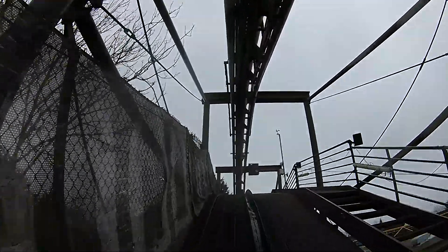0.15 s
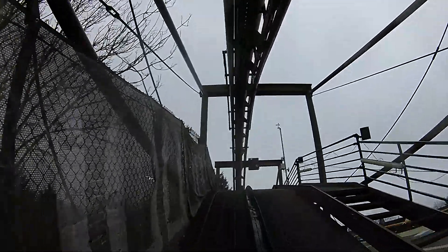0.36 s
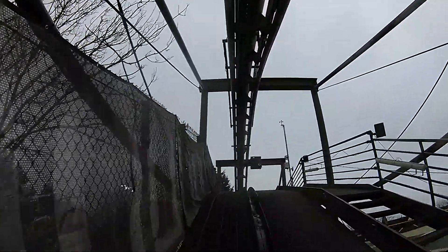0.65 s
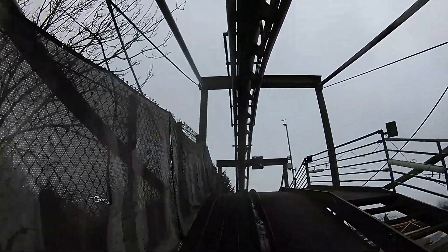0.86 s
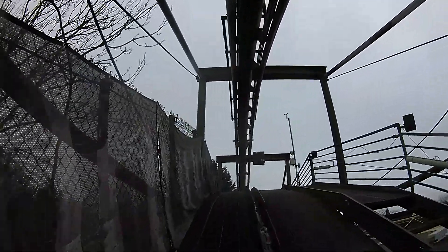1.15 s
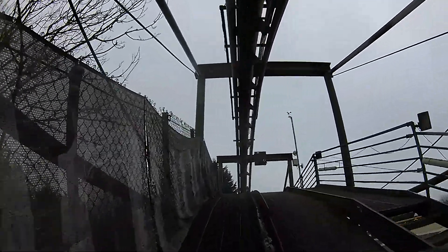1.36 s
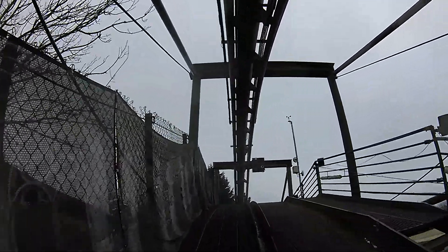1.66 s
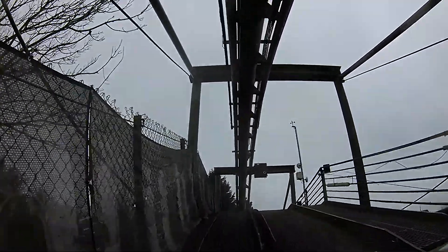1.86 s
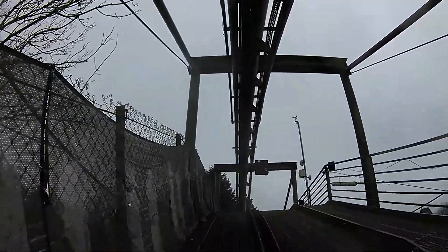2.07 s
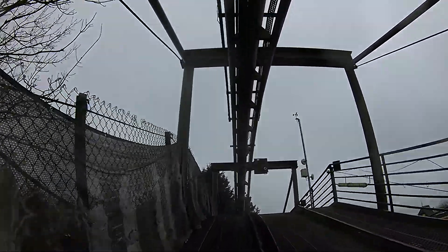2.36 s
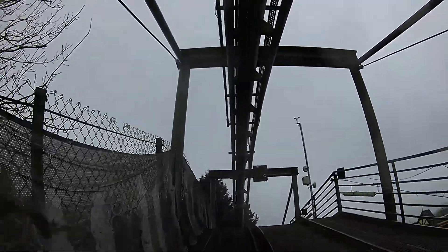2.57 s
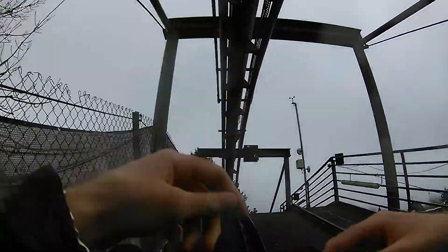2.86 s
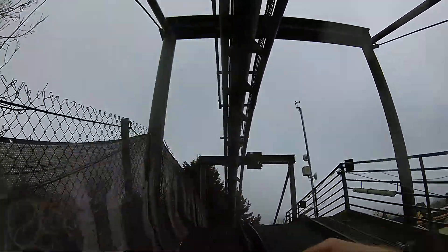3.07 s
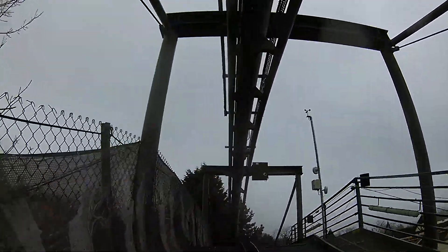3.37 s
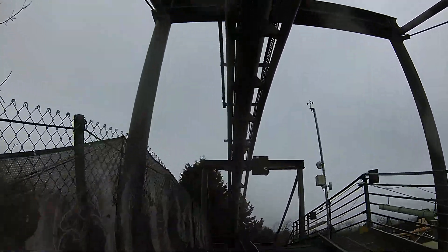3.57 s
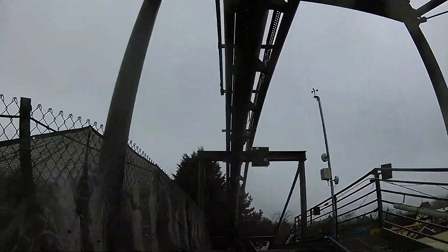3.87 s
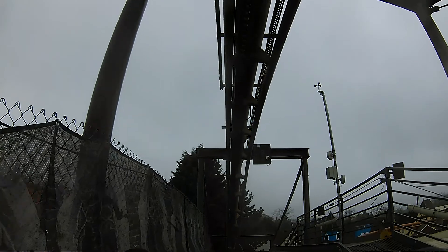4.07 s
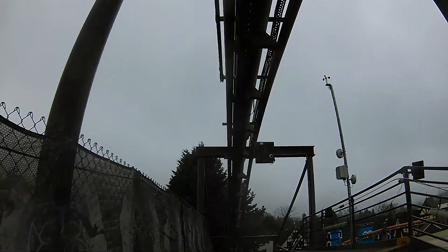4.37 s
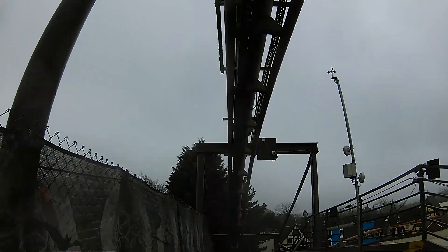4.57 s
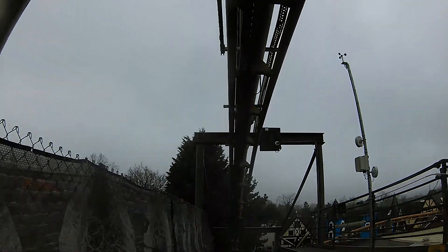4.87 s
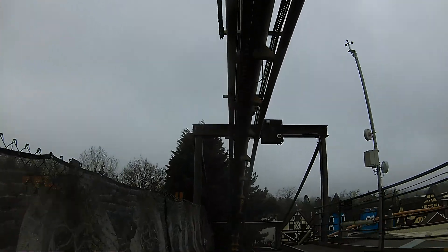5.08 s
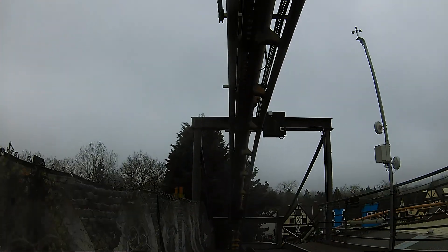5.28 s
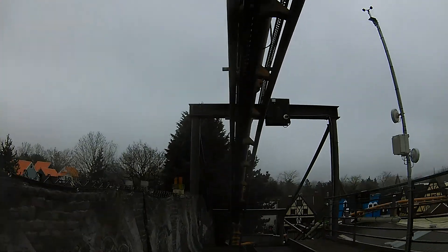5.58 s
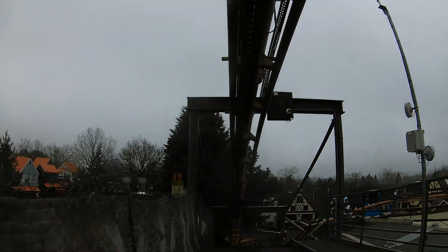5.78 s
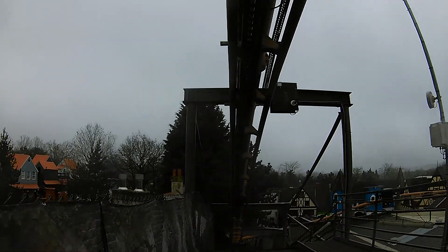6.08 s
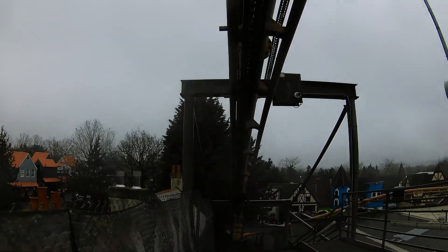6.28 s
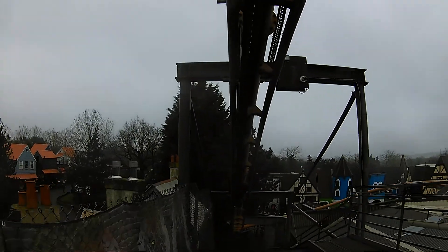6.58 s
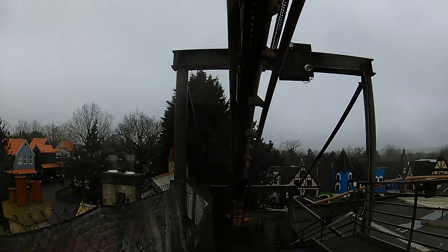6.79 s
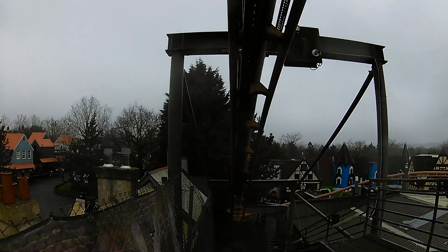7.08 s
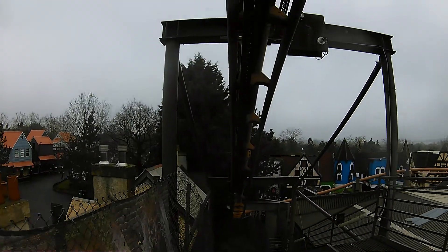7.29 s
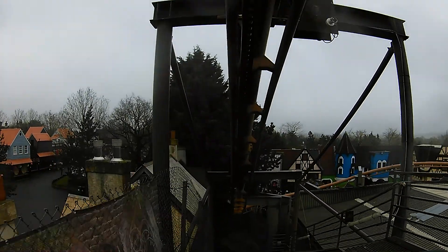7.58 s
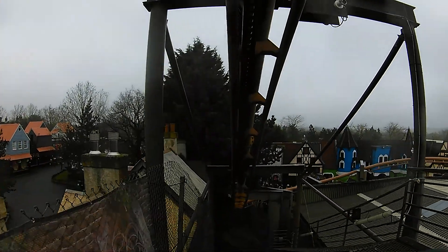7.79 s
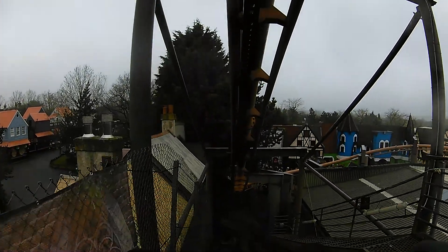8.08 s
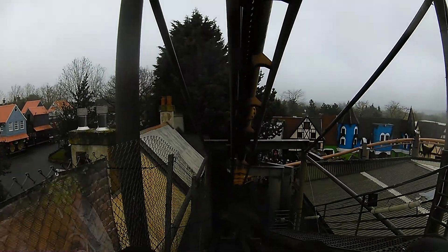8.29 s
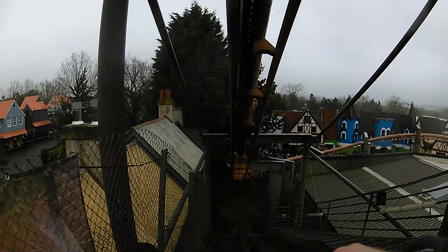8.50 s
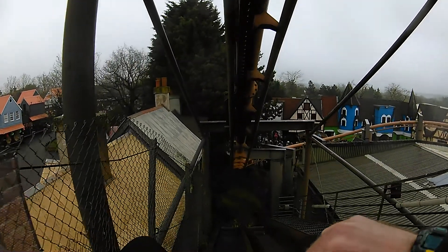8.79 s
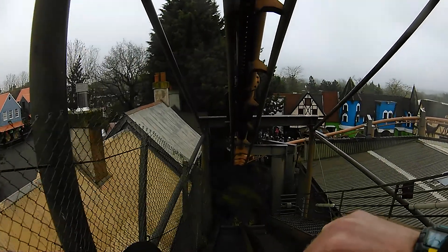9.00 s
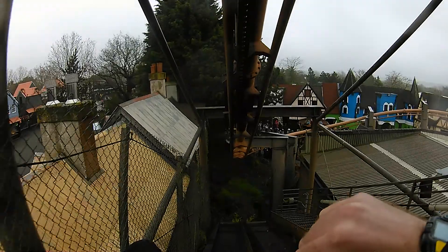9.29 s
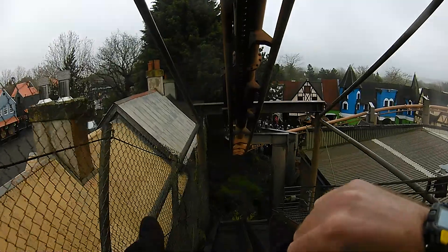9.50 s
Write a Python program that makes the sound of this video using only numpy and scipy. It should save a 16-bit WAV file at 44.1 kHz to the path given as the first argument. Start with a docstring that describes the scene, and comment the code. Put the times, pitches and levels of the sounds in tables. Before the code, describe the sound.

On board a climbing coaster train, bright steel clatter and rattle gradually die away under low wind puffs, before a few hard close taps.

```python
"""A train is hauled up a steel lift hill, heard from a small microphone in a hard case on board.
From the start, links and safety dogs clank about five times a second: swarms of tiny contacts ring the steel.
A noisy rattle continues between the blows, and filtered low noise makes the wind that buffets the port.
Clanks and rattle fade as the train moves off the chain; far air noise stays steady beneath.
Near the end a few sharp taps land on the case and set its short, damped modes ringing."""
import sys
import numpy as np
from scipy import signal
from scipy.fft import rfft, irfft
from scipy.io import wavfile

SR = 44100
rng = np.random.default_rng(int(sys.argv[2]) if len(sys.argv) > 2 else 0)


def waveform_to_disk(signal):
    """Save audio, clipped to [-1, 1], as 16-bit WAV at the path in sys.argv[1]."""
    frames = np.transpose(np.atleast_2d(signal))
    scaled = np.clip(frames, -1, 1) * 32767
    samples = np.round(scaled).astype(np.int16)
    wavfile.write(sys.argv[1], SR, samples)


def ratio(d):
    """dB to gain"""
    e = np.asarray(d, float) / 20
    return 10 ** e


N = 425565

# Clanks of links and safety dogs, on a beat of about .18 s with knocks between; ring levels are nominal:
# start_s, peak_db (main ring), deep_db (against the peak), deep_hz (centre), bright_db (against the peak),
# t60_s (before limits and the stretch of each region)
CLANK_BLOWS = [(.004, -18, -9.5, 1510, -13, 0.047), (.147, -5, -14, 1780, -6.5, 0.13),
               (.182, -15.5, -12.5, 1510, -16, 0.4), (.311, -16.5, -14.5, 1730, -18, 0.25),
               (.338, -11.5, -11.5, 1970, -17, 0.29), (.363, -11, -15, 1400, -10.5, 0.13),
               (.453, -18.5, -43, 1250, -27, 0.19), (.505, -16.5, -25, 1710, -5.5, 0.38),
               (.545, -1, -22, 1400, -13.5, 0.1), (.663, -14.5, -26, 1840, -11, 0.39),
               (.735, -6, -19.5, 1800, -14.5, 0.22), (.822, -15, -3, 1240, -14.5, 0.23),
               (.909, -4, -17, 1330, -12.5, 0.17), (1.007, -19.5, -17, 1300, -6, 0.29),
               (1.058, -15, -15, 1230, -14.5, 0.4), (1.099, -12.5, -6, 1700, -15, .12),
               (1.226, -9.5, -14.5, 1650, -13.5, 0.54), (1.26, -5.5, -14.5, 1310, -5, 0.092),
               (1.392, -13.5, -13.5, 1630, -11, 0.72), (1.463, -6.5, -16, 1910, -10.5, .079),
               (1.643, .5, -19.5, 1240, -17.5, 0.13), (1.746, -18.5, -12, 1780, -14, 1),
               (1.849, -33.5, -10, 1230, 0, 0.14), (1.916, -17.5, -38, 1530, -8, 0.21),
               (2.011, -3, -18, 1740, -15.5, 0.18), (2.134, -18.5, -25, 1850, -15, .57),
               (2.173, -9, -14, 1730, -11, .15), (2.206, -9.5, -20, 1750, -13.5, .095),
               (2.301, -18.5, -25, 1840, -21, 0.29), (2.369, -7.5, -16.5, 1230, -5, 0.19),
               (2.547, -12.5, -18, 1150, -12, 0.2), (2.679, -18.5, -12, 1230, -15, 0.22),
               (2.749, -4.5, -17.5, 1360, -13, 0.14), (2.869, -21, -10.5, 1130, -14, 0.28),
               (2.939, -22.5, -14, 1220, -1.5, 0.085), (3.08, -19, -5.5, 1250, -1.5, 0.14),
               (3.117, -28, -13, 1230, -4, 0.11), (3.312, -12.5, -14.5, 1010, -0.5, 0.21),
               (3.44, -21, -24, 1190, -14, 0.16), (3.463, -12, -12, 1230, -3.5, 0.22),
               (3.507, -24.5, -3.5, 1190, -3.5, 0.15), (3.587, -27, -13, 1820, -13, 0.15),
               (3.629, -31, -10, 1160, -9, 0.29), (3.847, -38, 2.5, 1540, 1, 0.091),
               (4.014, -26, -14.5, 1250, -13, 0.2), (4.154, -26.5, -11, 1810, -8, 0.36),
               (4.24, -19, -14.5, 1230, -5, 0.28), (4.362, -21.5, -14, 1270, -11, .24),
               (4.396, -25.5, -5, 1970, -1, 0.29), (4.592, -23, -26, 1780, -14, 0.22),
               (4.72, -36.5, -1, 1740, -8, 0.26), (4.907, -29, -20, 1680, -17, 0.16),
               (4.944, -17.5, -31, 1290, -23, .25), (5.106, -26, -24, 1830, -15, .25),
               (5.142, -23, -10.5, 1940, 3, 0.18), (5.256, -28, -15, 1820, -14, .3),
               (5.303, -26.5, -5.5, 1940, 3, 0.19), (5.45, -32, -3, 1800, -8, 0.18),
               (5.769, -47, -5, 1740, -23, 0.27), (5.649, -20, -17.5, 1700, -21, 0.25),
               (5.866, -34, -32, 1740, -5, 0.25), (6.038, -24.5, -10.5, 1780, 0, 0.23),
               (6.119, -26.5, -10, 1800, -6, 0.32), (6.204, -24, -38, 1400, -14, 0.28),
               (6.363, -33, -7, 885, -10, 0.23), (6.44, -31, -10, 1590, -14, 0.27),
               (6.497, -27, -3.5, 1200, -9, 0.22), (6.537, -32.5, 0, 1720, -3, 0.32),
               (6.738, -27.5, -14, 1820, -8, 0.21), (6.94, -22.5, -24, 1800, -15.5, 0.26),
               (7.108, -21.5, -29, 1230, -9, 0.45), (7.207, -37.5, 1, 1230, -8, 0.23),
               (7.289, -27.5, -25, 1530, -17, 0.21), (7.368, -39.5, -10, 1390, -9, 0.48),
               (7.548, -46, -10, 1600, 0, 0.043), (7.594, -41.5, -3, 1630, -3, 0.13),
               (7.708, -38, -5, 1520, -28, 0.2), (7.787, -29, -27, 1250, -27, .4),
               (7.841, -23.5, -20, 1070, -6.5, .26), (7.982, -25.5, -35, 1230, -17, 0.29),
               (8.027, -37, -7, 1230, -6, 0.18), (8.09, -36.5, 0, 1570, -17, 0.37),
               (8.187, -40, -6, 940, -5, 0.12), (8.297, -27.5, -45, 1410, -38, 0.32),
               (8.375, -30.5, -19, 1660, -7.5, 0.27), (8.534, -31, -7, 1600, -11, 0.15),
               (8.694, -23.5, -18.5, 1220, -19, 0.36), (8.749, -31, -27, 1670, -3.5, 0.2),
               (8.845, -31.5, -13, 1130, -16, 0.45), (8.933, -27.5, -22, 1320, -18, 0.22),
               (9.068, -33, -8, 1120, -19, 0.13), (9.19, -46, -18, 1230, -9, 0.36),
               (9.269, -32.5, -24, 1170, -16, 0.22), (9.418, -33, -24, 1800, -35, .17),
               (9.459, -27.5, -23, 900, -19, 0.16), (9.589, -33, -9.5, 1240, -25, 0.16)]
# Running rattle of chain and wheels, before random swings and the lean of the main ring:
# time_s, main_db, deep_db, bright_db
RATTLE_LEVELS = [(0, -32.5, -38.5, -36.5), (.24, -49.5, -52.5, -56.5), (.5, -32.5, -42.5, -45.5),
                 (.95, -38.5, -44.5, -46.5), (1.35, -46, -56, -50.5), (1.8, -39.5, -43, -45.5),
                 (2.25, -46, -49.5, -48.5), (2.8, -41.5, -47.5, -49), (3.2, -47.5, -53, -48.5),
                 (3.6, -49.5, -49, -47), (4.25, -46, -52.5, -50), (4.95, -50, -58, -54),
                 (5.4, -49.5, -48, -45.5), (6, -50.5, -59, -60), (7.2, -51, -59.5, -58.5),
                 (8.38, -53.5, -60.5, -60), (8.76, -46.5, -52, -52), (9.05, -59.5, -60.5, -61.5),
                 (9.65, -52.5, -59, -67.5)]
# Pitch favoured by the clanks, jumping up and down from moment to moment: time_s, main_hz, bright_hz
FAVOURED_PITCH = [(.15, 2620, 4300), (.55, 2536, 4590), (1, 2500, 4940), (1.1, 2570, 3360),
                  (1.47, 2490, 3400), (1.64, 2518, 4830), (1.78, 2570, 4800), (1.95, 2510, 3250),
                  (2.37, 2530, 4070), (2.6, 2560, 3250), (2.75, 2465, 4770), (2.95, 2660, 3120),
                  (3.15, 2490, 3140), (3.31, 2650, 4660), (3.47, 2585, 3120), (4.3, 2590, 4730),
                  (4.8, 2680, 3330), (5.15, 2673, 5100), (6.04, 2523, 5150), (6.4, 2490, 3320),
                  (6.75, 2630, 4700), (7.1, 2700, 5050), (7.6, 2740, 5170), (7.83, 2615, 3330),
                  (8.3, 2620, 5100), (8.75, 2450, 3840), (9.65, 2460, 3700)]
# Resonances of the steelwork as the case passes them on, in four regions: pitch_hz, width_hz, level_db (relative)
DEEP_MODES = [(552, 37, -16.5), (837, 62, -8), (1010, 56, -9.5), (1130, 30, -4), (1230, 21.6, 0),
              (1306, 48, -4.5), (1602, 284, -11), (1740, 19.4, 0.5), (1820, 22, -3)]
MAIN_MODES = [(2296, 32, -12.5), (2394, 250, -4), (2515, 81, -6.5), (2570, 18.4, -2), (2628, 40.5, -3.5),
              (2703, 39, -3), (2905, 220, -14.5)]
BRIGHT_MODES = [(3046, 66, -5), (3243, 31, 3), (3525, 110, -6), (3753, 55, 2), (4180, 276, -5.5),
                (4670, 95, -3), (5002, 90, 2), (5086, 38, -0.5), (5160, 145, -0.5)]
HISS_MODES = [(5900, 300, -8.5), (7040, 160, -4.5), (8220, 220, -16.5), (9940, 360, -5)]
# Strength of the wind, before random swings: time_s, buffet_db (slow buffeting), flutter_db
WIND_STRENGTH = [(0.0, -64, -57), (0.56, -54, -53), (0.97, -52, -64), (1.24, -64, -58.5), (1.83, -58, -54),
                 (1.96, -54, -59.5), (3.17, -58, -54.5), (3.55, -65, -53), (3.92, -56, -51),
                 (4.16, -60, -63), (5.62, -58, -61), (5.89, -59, -65), (6.53, -64, -67.5), (7.31, -63, -59),
                 (7.9, -65, -70.5), (8.57, -61, -52), (9.14, -61, -55.5), (9.65, -64, -59)]
# Sharp puffs: start_s (the crest comes one rise later), peak_db (flutter), buffet_db (against the flutter)
WIND_PUFFS = [(0.361, -37, 3), (0.749, -43, -4), (0.909, -35, -15), (1.129, -50, -2), (1.46, -41, -8),
              (1.848, -35, -3), (2.009, -36.5, 3), (2.229, -52, -6.0), (2.569, -39, -11), (3.329, -47, 3),
              (3.889, -49, -1), (4.459, -55, -6.0), (5.429, -42, -8), (7.041, -37, -20), (7.339, -56, 1),
              (8.189, -62, -13), (8.641, -57, -11), (9.402, -46, -11), (9.532, -38, 1)]
# Colour of the far noise: pitch_hz, level_db (per Hz, relative)
AIR_COLOUR = [(60, -8), (160, 19), (310, 16), (630, 14.5), (2500, 19), (7000, 5.5), (10000, 2.5),
              (13000, -0.5), (15600, -3)]
# Taps on the case: start_s, peak_db, top_hz (hardness, as a low-pass corner)
CASE_TAPS = [(8.4862, -1, 8900), (8.500, -24, 2500.), (8.513, -19.5, 2450), (8.520, -25, 2500.),
             (8.5821, 0, 11100), (8.6185, -0.2, 9000.), (8.631, -25, 2000.), (9.5435, -14.5, 1820)]
# Modes of the case: pitch_hz, level_db (relative), t60_s
CASE_MODES = [(640, -14, 0.0081), (1106, -4.5, 0.015), (1820, -1.5, 0.024), (2290, 2.5, 0.011),
              (2504, 2.5, 0.017), (3250, -11.5, 0.021), (3570, -14, 0.015), (4050, -18, 0.03),
              (4550, -15, 0.014), (5520, -10.5, 0.012), (7250, -20, 0.0054), (8700, -24.5, 0.011),
              (9770, -22.5, 0.0077), (11800, -24, 0.0056)]

# rise of a full-scale blow before scaling by ring time and limits, and the longest rise
NEAR_RISE_S, FAR_RISE_S = 0.00015, 0.012
SMEAR, LEAD_RISES = 1.1, 0.96  # dB of rise per dB of faintness; early start, in rises
KNOCK_T60_S = 0.16  # contacts that last longer are scrapes
MAIN_SCATTER, BRIGHT_SCATTER = 0.015, 0.055  # spread of the spot struck, as shares of pitch
# dB of hiss per dB of bright ring; offset in dB; dB of hiss lost per dB of peak: hard blows hiss less
HISS_FOLLOWS_BRIGHT, HISS_UNDER_BRIGHT_DB, HISS_PER_DB = 1.19, -19, 0.3011
RATTLE_LEAN, RATTLE_REACH_OCTAVES = 0.64, 0.045  # the rattle leans towards the same main pitch
# random faint knocks: rate, mean peak over the rattle, spread of levels
KNOCKS_PER_S, KNOCK_OVER_DB, KNOCK_SPREAD_DB = 1.6, 6.5, 3.5
KNOCK_DEEP_DB, KNOCK_BRIGHT_DB, KNOCK_RING_S = -6, -7.5, 0.073  # mean rings against the peak; t60
PUFF_RISE_S, PUFF_FALL_S, PUFF_CREST_DB = 0.0074, 0.024, 4  # time constants; peak over rms
BUFFET_SWING_DB, FLUTTER_SWING_DB = 3.5, 3  # random swings of the wind
AIR_DB = -73.5  # rms between 11 and 15.6 kHz


def rms_one(x):
    """Normalization: equal mean power, by scaling to rms 1."""
    return x / np.sqrt(np.mean(x ** 2) + 1e-20)


def in_time(rows):
    """Linear interpolation: each column becomes a curve with one value a sample."""
    time_s, *columns = np.transpose(rows)
    return [np.interp(np.arange(N) / SR, time_s, column) for column in columns]


def band(x, low_hz, high_hz):
    """Band-pass filtering with a Butterworth response."""
    edges_hz = [low_hz, min(high_hz, .45 * SR)]
    return signal.sosfilt(signal.butter(2, edges_hz, "band", fs=SR, output="sos"), x)


def drift(rate_hz):
    """Low-passed noise: a slow random fluctuation of rms 1, from two equal poles at rate_hz."""
    r = np.exp(-80 * np.pi * rate_hz / SR)  # one slow value every 40 samples
    white = rng.standard_normal(N // 40 + 2002)
    slow = signal.lfilter([1], [1, -2 * r, r * r], white)[2000:]
    return np.interp(np.arange(N) / 40, np.arange(len(slow)), rms_one(slow))


def contacts(per_s, spread_db):
    """Shot noise: dense tiny metal contacts at random moments, of uneven size and either sign, at rms 1."""
    sizes = ratio(spread_db * np.minimum(rng.exponential(1, N), 5)) * rng.choice([-1, 1], N)
    return rms_one(sizes * (rng.random(N) < per_s / SR))


def blows(hits, modes, levels_db, favoured_hz, reach_octaves, crack_s, tail_db, tail_stretch):
    """Impact and decay: a rise, a short crack, then the frame rings on; powers of all blows add per resonance."""
    power, t = np.zeros((len(modes), N)), np.arange(SR // 3) / SR
    hz, width_hz, mode_db = np.transpose(modes)
    mode_power = width_hz * ratio(2 * mode_db)
    for (start_s, peak_db, *_, t60_s), level_db, centre_hz in zip(hits, levels_db, favoured_hz):
        # faint far blows and long scrapes swell slowly
        rise_s = NEAR_RISE_S * ratio(-SMEAR * peak_db) * (t60_s / KNOCK_T60_S) ** 2.8
        rise_s = np.clip(rise_s, .0002, FAR_RISE_S)
        rise = (1 - np.exp(-t / rise_s)) ** 2
        after = np.maximum(t - 2 * rise_s, 0)
        # the same push, spread over the rise
        spread_s = crack_s + rise_s
        crack = crack_s / spread_s * np.exp(-2 * after / spread_s)
        ring_s = np.clip(t60_s, .03, .6) * tail_stretch
        tail = ratio(2 * (tail_db - 60 * after / ring_s))
        # the spot struck favours nearby resonances, at unchanged total power
        share = 0.096 + np.exp(-(np.log2(hz / centre_hz) / reach_octaves) ** 2)
        share = share * np.sum(mode_power) / np.sum(share * mode_power)
        at = max(round((start_s - LEAD_RISES * rise_s) * SR), 0)
        blow = ratio(2 * level_db) * rise * (crack + tail)
        power[:, at:at + len(t)] += share[:, None] * blow[:N - at]
    return np.sqrt(power)


def knocks(rattle_db):
    """Random arrivals: faint knocks at uniformly distributed moments, in the columns of CLANK_BLOWS."""
    start_s = rng.uniform(0, N / SR, 24)[:int(KNOCKS_PER_S * N / SR)]
    luck = rng.normal(0, 1, (24, 4))[:len(start_s)]
    peak_db = rattle_db[(start_s * SR).astype(int)] + KNOCK_OVER_DB + KNOCK_SPREAD_DB * luck[:, 0]
    deep_hz = np.where(luck[:, 1] > 0, DEEP_MODES[4][0], DEEP_MODES[7][0])
    deep_db = KNOCK_DEEP_DB + KNOCK_SPREAD_DB * luck[:, 2]
    bright_db = KNOCK_BRIGHT_DB + KNOCK_SPREAD_DB * luck[:, 3]
    return np.transpose([start_s, peak_db, deep_db, deep_hz, bright_db, KNOCK_RING_S + 0 * start_s])


def steel(envelopes, drive, modes, low_hz, high_hz, broad_db, patchy_db):
    """Modal superposition: parallel resonances over a broad band, each driven unevenly by a wandering contact."""
    def respond(inputs):
        """Linear response: two-pole resonators of alternating sign, summed and band-limited."""
        out = 0
        for k, ((hz, width_hz, level_db), x) in enumerate(zip(modes, inputs)):
            r = np.exp(-np.pi * width_hz / SR)
            zeros = ratio(level_db) * (1 - r * r) / 2 * np.array([1, 0, -1]) * (-1) ** k
            poles = [1, -2 * r * np.cos(2 * np.pi * hz / SR), r * r]
            broad = ratio(broad_db) / len(modes) * x
            out = out + broad + signal.lfilter(zeros, poles, x)
        return band(out, low_hz, high_hz)
    # the energy of the impulse response: steady unit noise would come out at rms 1
    impulse = 1. * (np.arange(8192) == 0)
    size = np.linalg.norm(respond([impulse] * len(modes)))
    return respond(drive * shape * ratio(patchy_db * drift(15.4)) for shape in envelopes) / size


def lift_hill():
    """Forced resonance: clanks and rattle drive four regions of modes, each by its own swarm of contacts."""
    rattle_db = in_time(RATTLE_LEVELS)
    pitch_hz = in_time(FAVOURED_PITCH)
    hits = np.vstack([CLANK_BLOWS, knocks(rattle_db[0])])
    peak_db, deep_db, deep_hz, bright_db = hits.T[1:5]
    spot = rng.standard_normal((len(hits), 2)).T * [[MAIN_SCATTER], [BRIGHT_SCATTER]]
    main_hz, bright_hz = np.array(pitch_hz)[:, (hits[:, 0] * SR).astype(int)] * np.exp(spot)
    hiss_db = HISS_FOLLOWS_BRIGHT * bright_db + HISS_UNDER_BRIGHT_DB - HISS_PER_DB * peak_db

    main_bed, deep_bed, bright_bed = (ratio(db + 0.67 * drift(14.5) + 1.44 * drift(12)) for db in rattle_db)
    away = np.log2(np.array(MAIN_MODES)[:, :1] / pitch_hz[0]) / RATTLE_REACH_OCTAVES
    main_bed = main_bed * ratio(-2.0) * (1 + RATTLE_LEAN * np.exp(-away ** 2))

    deep = deep_bed + blows(hits, DEEP_MODES, peak_db + deep_db, deep_hz, reach_octaves=0.11,
                            crack_s=0.0012, tail_db=-9.5, tail_stretch=0.98)
    main = main_bed + blows(hits, MAIN_MODES, peak_db, main_hz, reach_octaves=0.026,
                            crack_s=0.00023, tail_db=-18.0, tail_stretch=0.79)
    bright = bright_bed + blows(hits, BRIGHT_MODES, peak_db + bright_db, bright_hz, reach_octaves=0.06,
                                crack_s=0.00036, tail_db=-7.5, tail_stretch=0.77)
    hiss_bed = ratio(-11.5) * bright_bed
    hiss = hiss_bed + blows(hits, HISS_MODES, peak_db + hiss_db, bright_hz, reach_octaves=8.4,
                            crack_s=0.0038, tail_db=-9.0, tail_stretch=0.9)
    return (steel(deep, contacts(5000, 1.37), DEEP_MODES, 303, 2140, broad_db=-22.0, patchy_db=2.5)
            + steel(main, contacts(6000, 3.25), MAIN_MODES, 2030, 2890, broad_db=-16.5, patchy_db=1.0)
            + steel(bright, contacts(10000, 3.5), BRIGHT_MODES, 2870, 4920, broad_db=-16.5, patchy_db=0.0)
            + steel(hiss, contacts(15000, 0.89), HISS_MODES, 4900, 8630, broad_db=-13.5, patchy_db=3.0))


def wind():
    """Turbulent pressure: lumpy low noise on the port in two ranges; gusts swell slowly, puffs come sharply."""
    buffet_db, flutter_db = in_time(WIND_STRENGTH)
    start_s, peak_db, against_db = np.transpose(WIND_PUFFS)[:, :, None]
    since = np.arange(0, N, 40) / SR - start_s - PUFF_RISE_S  # from the crest, every 40 samples
    growth = np.where(since < 0, since / PUFF_RISE_S, -since / PUFF_FALL_S)
    puffs = ratio(peak_db - PUFF_CREST_DB) * np.exp(growth)
    buffet_puffs, flutter_puffs = (
        np.interp(np.arange(N) / 40, np.arange(puffs.shape[1]), p.sum(axis=0))
        for p in (puffs * ratio(against_db), puffs))

    buffet = band(band(rng.standard_normal(N), 35.5, 54.5), 32, 136) * ratio(1.1 * drift(3.5))
    white = rng.standard_normal(N)
    flutter = band(white, 57.0, 108.5) + ratio(-8.5) * band(white, 75.0, 186.0)
    flutter = flutter * ratio(2.4 * drift(23.0))
    buffet_level = ratio(buffet_db + BUFFET_SWING_DB * drift(2.6)) + buffet_puffs
    flutter_level = ratio(flutter_db + FLUTTER_SWING_DB * drift(16)) + flutter_puffs
    return buffet_level * rms_one(buffet) + flutter_level * rms_one(flutter)


def far_noise():
    """Stationary coloured noise: the smooth, steady noise of the open air and the microphone."""
    hz = np.maximum(np.fft.rfftfreq(N, 1 / SR), 1)
    colour_hz, colour_db = np.transpose(AIR_COLOUR)
    colour = ratio(np.interp(np.log(hz), np.log(colour_hz), colour_db))
    noise = irfft(rfft(rng.standard_normal(N)) * colour, N)
    return ratio(AIR_DB) * noise / np.std(band(noise, 11000, 15600))


def case_taps():
    """Impulsive excitation: a tap rings the short modes of the case; a softer tap excites less treble."""
    out, t = np.zeros(N), np.arange(int(.06 * SR)) / SR
    ring = 0
    for k, (hz, level_db, t60_s) in enumerate(CASE_MODES):
        ring = ring + ratio(level_db - 60 * t / t60_s) * np.sin(2 * np.pi * hz * t) * (-1) ** k
    for start_s, peak_db, top_hz in CASE_TAPS:
        softness = signal.butter(3, np.clip(top_hz, 500, 18000), fs=SR, output="sos")
        tap = signal.sosfilt(softness, ring)
        at = round(start_s * SR)
        out[at:at + len(t)] += (ratio(peak_db) * tap / np.abs(tap).max())[:N - at]
    return out


def scene():
    """Superposition: the pressures of all sources add at one microphone."""
    return (lift_hill() + wind() + far_noise() + case_taps())[None]


def low_pass(x):
    """Removes everything above the highest recorded frequency."""
    return signal.sosfilt(signal.butter(12, 15690, fs=SR, output="sos"), x)


def record(dry):
    """High-pass response: the microphone loses the lowest bass."""
    heard = signal.sosfilt(signal.butter(2, 38, "high", fs=SR, output="sos"), dry)
    return low_pass(heard)


dry = scene()
out = record(dry)
waveform_to_disk(out)
```